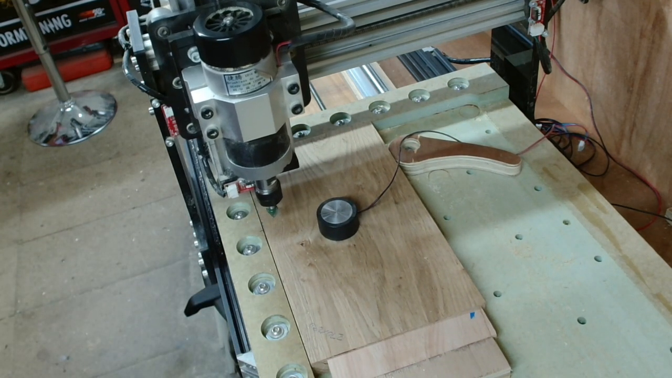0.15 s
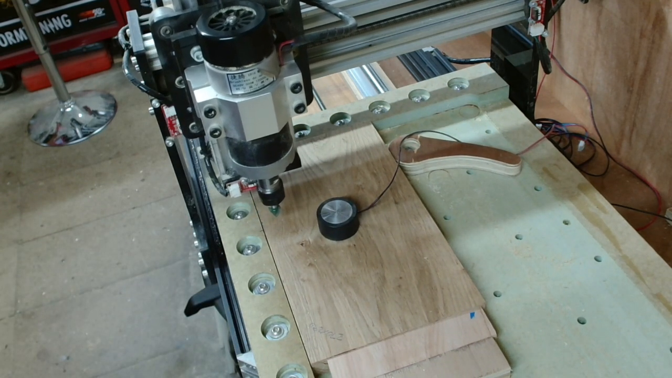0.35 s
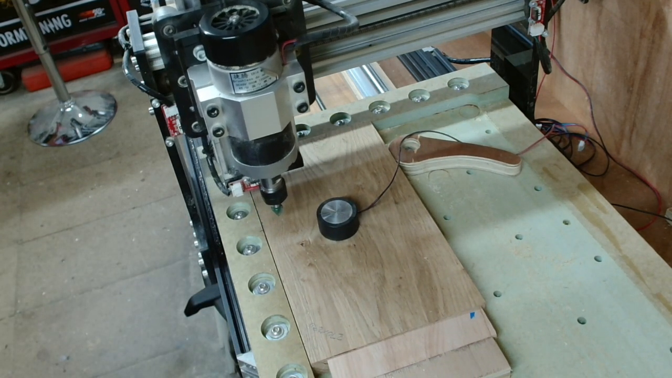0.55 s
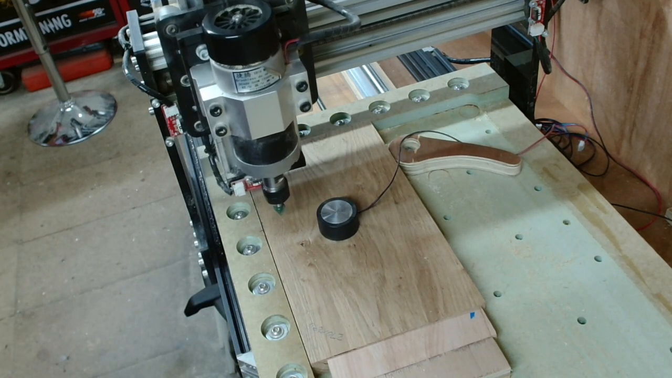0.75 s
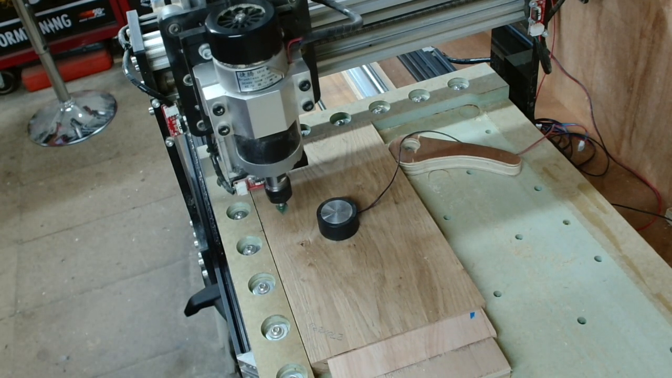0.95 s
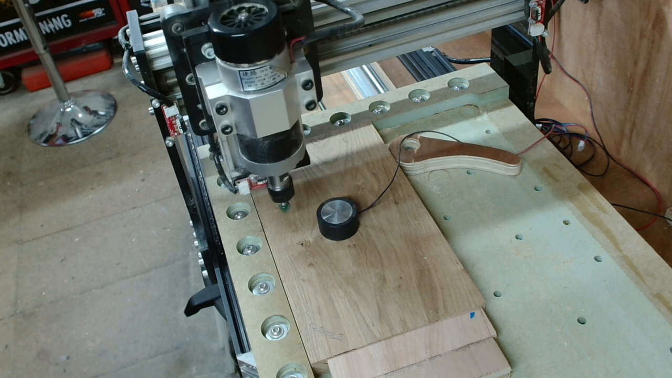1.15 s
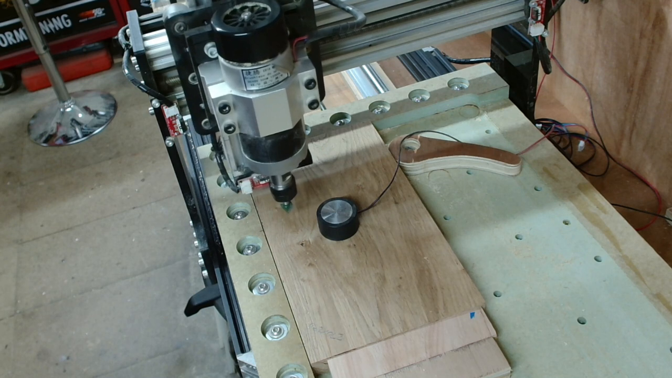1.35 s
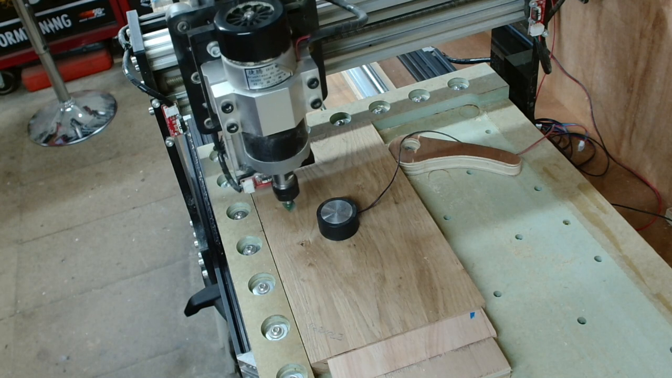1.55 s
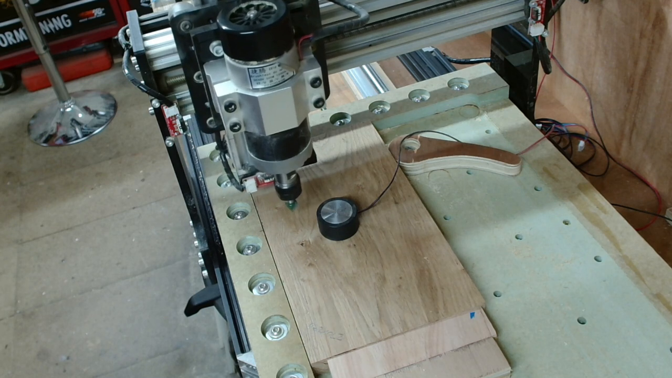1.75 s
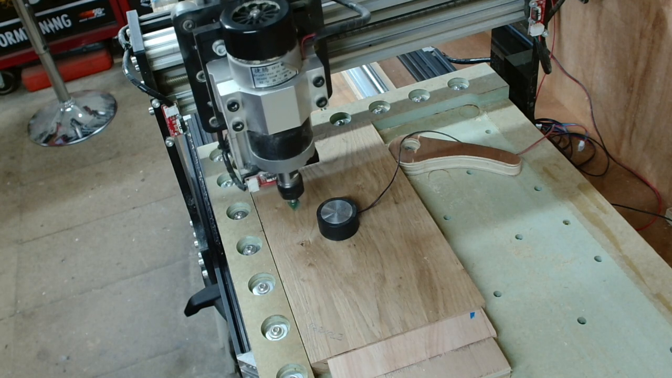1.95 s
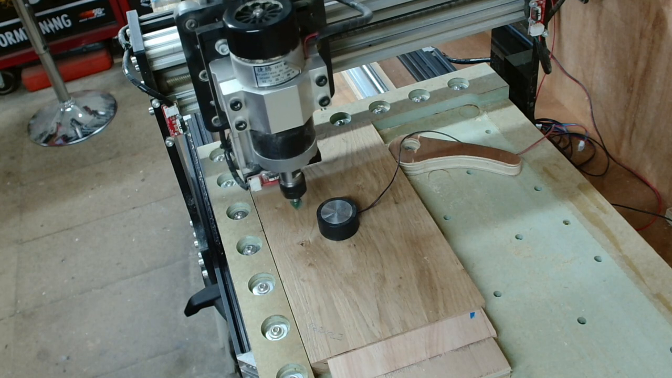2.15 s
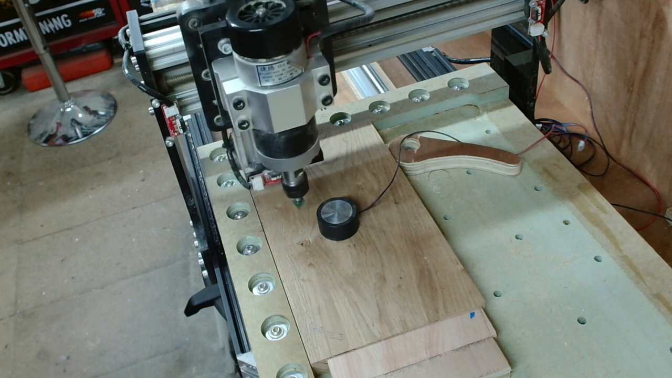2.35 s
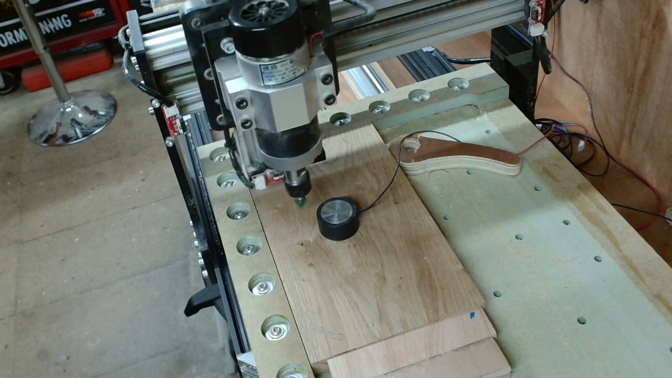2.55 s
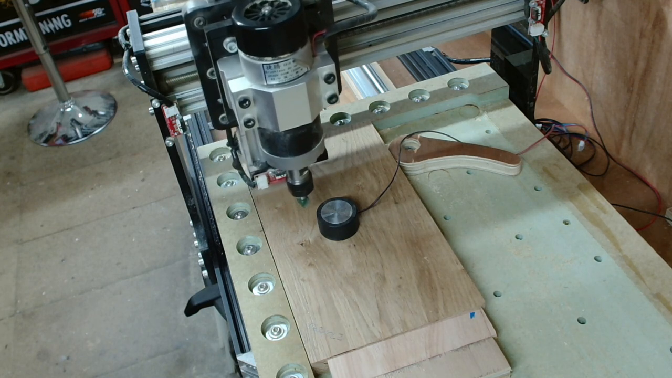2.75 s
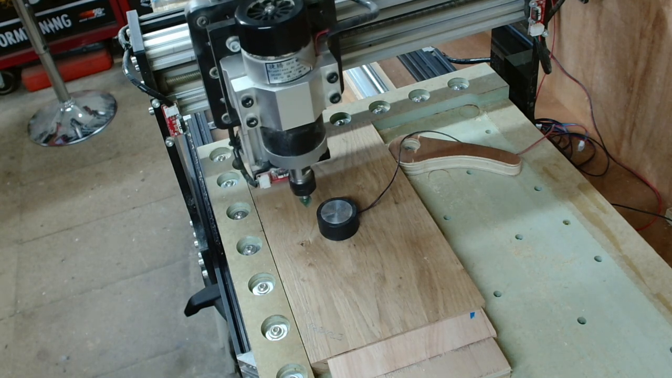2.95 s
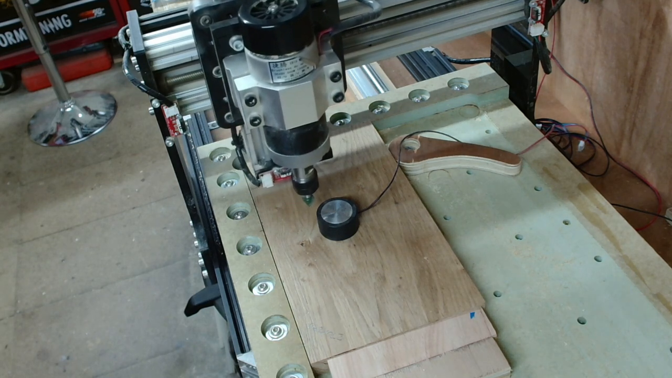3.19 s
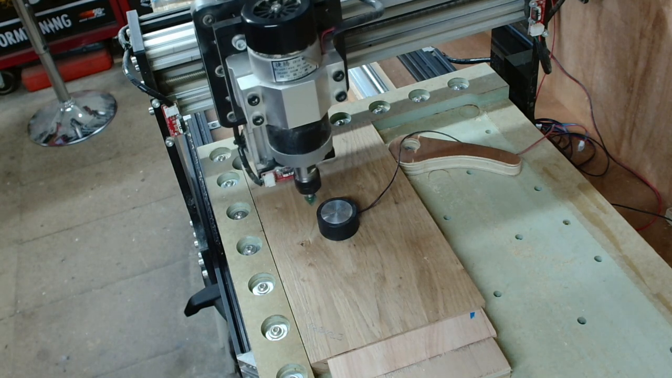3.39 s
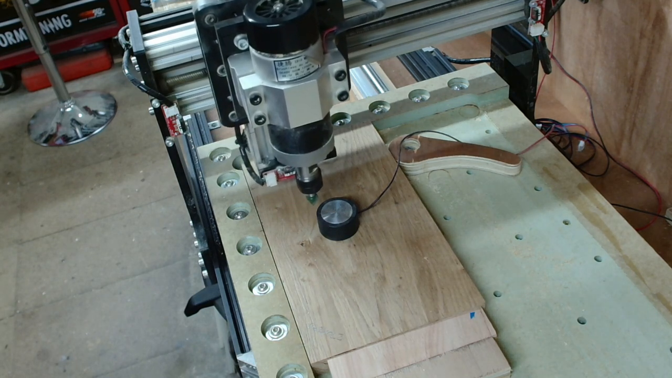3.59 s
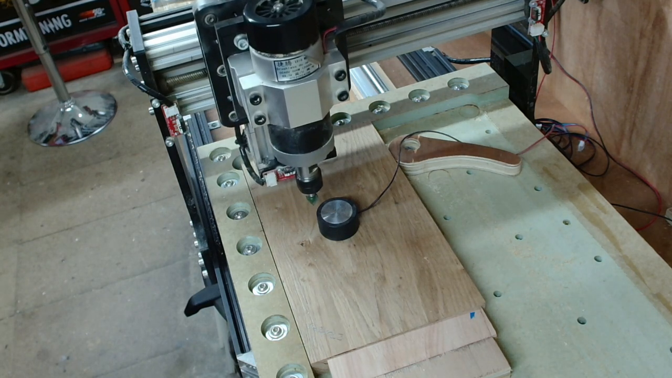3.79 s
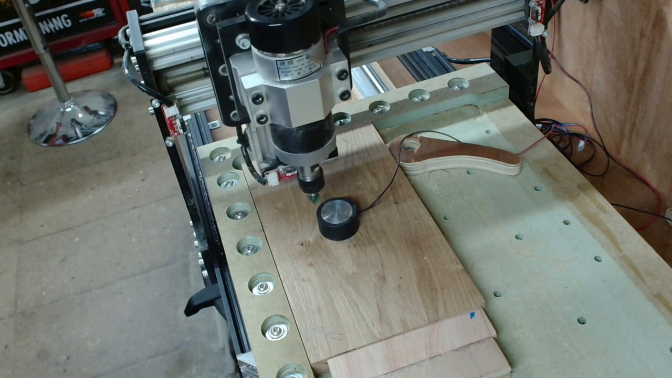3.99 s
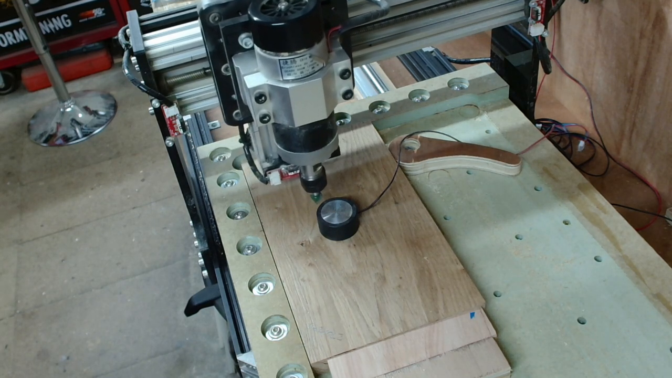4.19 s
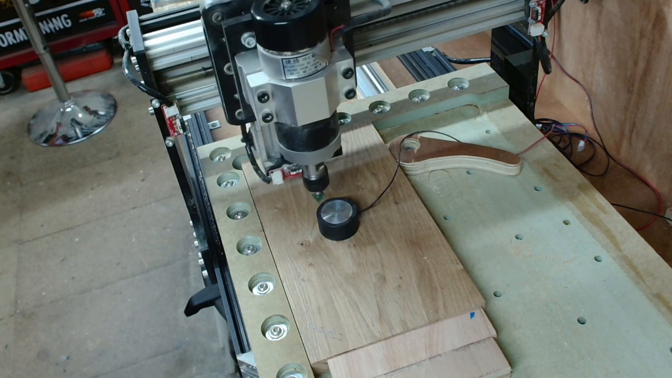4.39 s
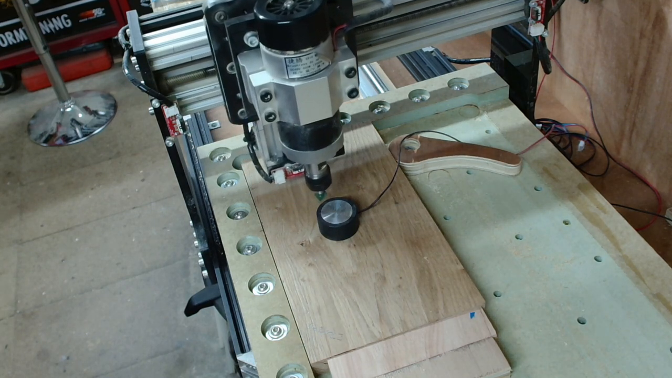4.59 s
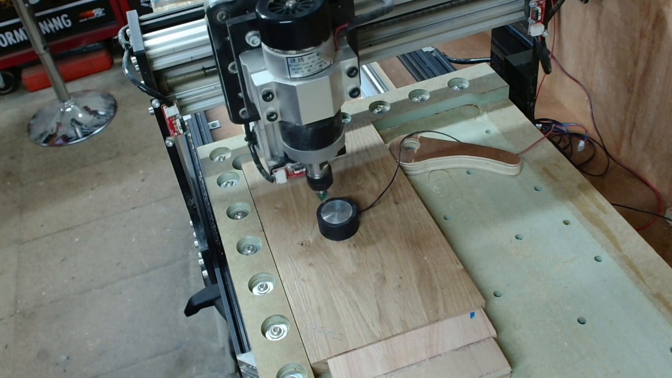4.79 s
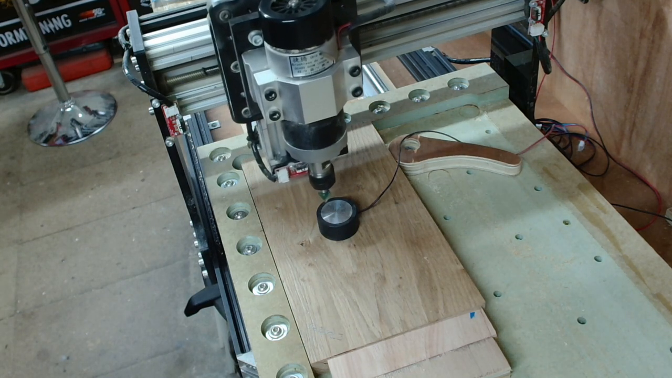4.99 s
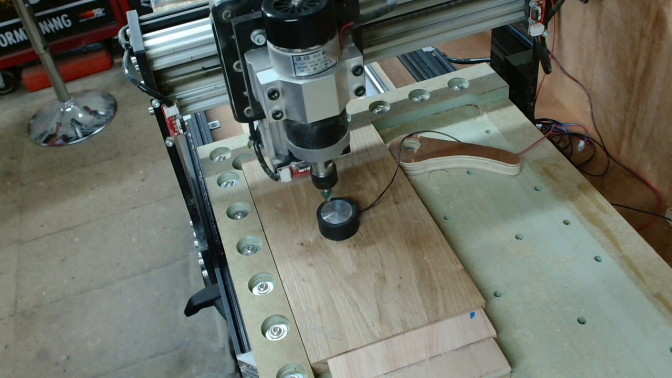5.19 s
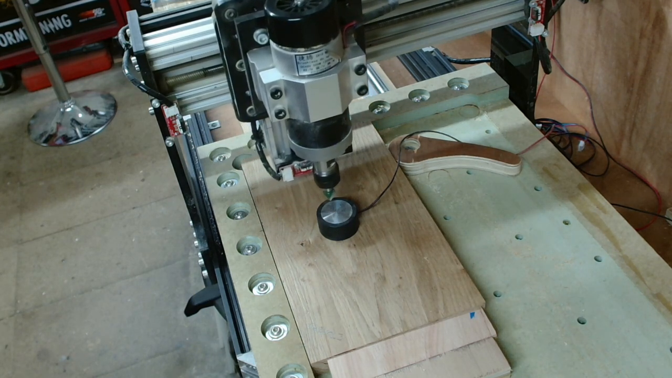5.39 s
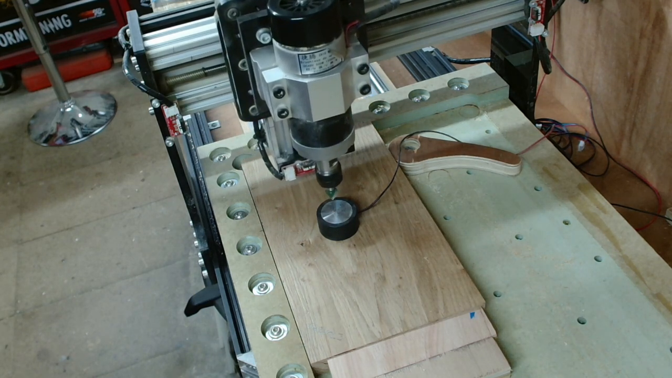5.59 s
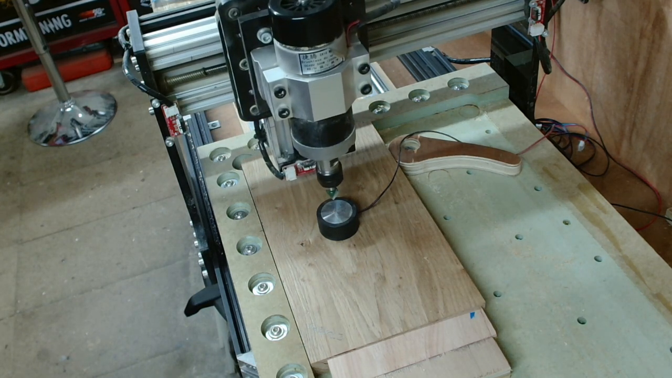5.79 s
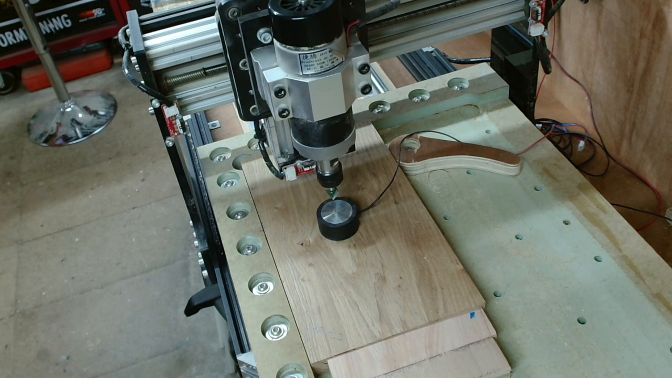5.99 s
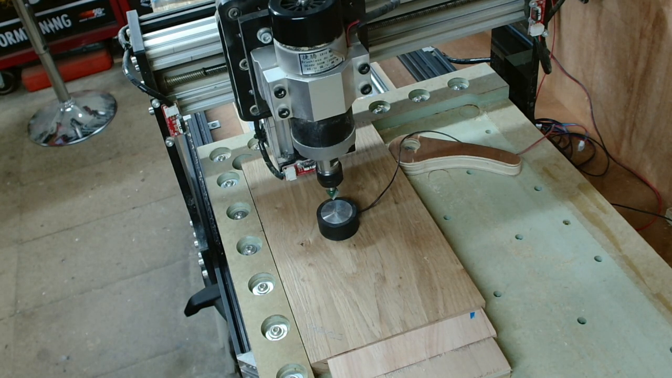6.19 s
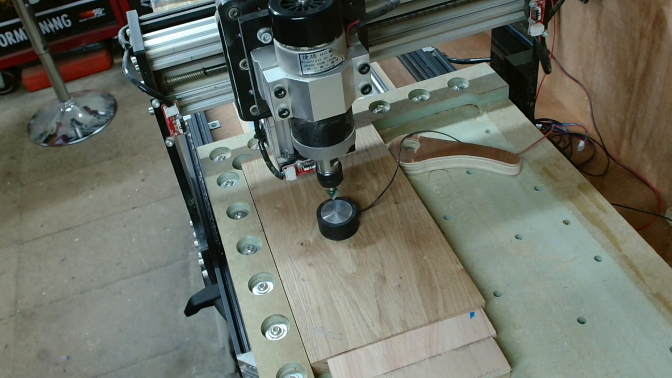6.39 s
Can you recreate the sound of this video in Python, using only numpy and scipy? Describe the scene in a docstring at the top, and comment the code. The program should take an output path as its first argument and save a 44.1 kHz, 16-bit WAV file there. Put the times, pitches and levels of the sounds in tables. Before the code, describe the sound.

Close-up buzzy motor drone around 290 hertz switches on and off as a machine carriage jogs, with soft clicks, dull knocks and quiet workshop hiss.

```python
"""A stepper motor jogs the carriage of a small router, close to a pair of microphone ports: each move ramps up,
holds a fixed step rate and ramps down, its overtones sweeping through the resonances of the frame.
The rolling carriage keeps loose parts ringing. A small cooling fan whines with blade-pass overtones amid steady
electrical hums, over shaped noise for workshop hiss and low rumble. Filtered noise puffs make small knocks
about the bench and the jog keys, which click before the later moves and during the long one."""
import sys
import numpy as np
from scipy import signal
from scipy.fft import rfft, irfft
from scipy.io import wavfile

SR = 44100
rng = np.random.default_rng(int(sys.argv[2]) if len(sys.argv) > 2 else 0)


def voltage_ratio(level):
    """Linear amplitude factor for a level in decibels (scalar or array-like)."""
    return 10 ** (np.asarray(level, float) / 20)


def store_wav(level_fs):
    """Save 16-bit WAV to argv[1]."""
    pcm = np.round(np.clip(np.atleast_2d(level_fs), -1, 1) * 32767)
    wavfile.write(sys.argv[1], SR, pcm.T.astype(np.int16))


N = 284004

# jog moves: start_s, standstill_s, flutter_hz (flutter of the carriage, wandering about this rate)
MOVES = [(-1.0, .03, 16.0), (.111, 3.631, 16.4), (3.879, 4.811, 17.2), (4.824, 5.762, 13.1),
         (6.406, 7.5, 16.0)]
# torque ripple heard at full speed: step_rate_multiple, level_db (rms), left_minus_right_db,
# left_lead_rad, extra_on_ramps_db
RIPPLE = [(.5, -37, -1.8, -.11, -6), (1, -14.9, -2.9, -.15, -5), (1.5, -53, -2, -.1, 6),
          (2, -32.6, 2.3, .45, 6), (3, -57, -2.9, -.14, 15), (4, -66, -2, -.2, 11), (5, -61, 1.3, -1.45, 0)]
# uneven drive wheel acting on the step tone: rate_hz (at full speed), level_swing_share, phase_swing_rad
WOBBLE = [(4.2, .04, .03), (8.2, .05, .05)]
# frame resonances under the motor: centre_hz, width_hz, gain_db
FRAME = [(80, 30, -24), (168, 19, -1.5), (296, 34, 0), (330, 30, -11), (385, 30, -15), (505, 24, 1),
         (720, 150, -26)]
# lightly damped parts shaken by the carriage: centre_hz, width_hz, level_db (rms while rolling, before panning)
RATTLE = [(146, 8, -47), (165, 20, -46), (186, 2.5, -40), (178, 20, -44.5), (215, 12, -47),
          (268, 18, -37.5), (290, 30, -45), (314, 10, -43), (337, 14, -46), (374, 18, -46), (393, 5, -52),
          (418, 20, -56), (493, 3, -41), (508, 4, -46), (490, 40, -47), (530, 20, -54)]
# fan tones: shaft_speed_multiple, level_db (rms a side), left_minus_right_db, left_lead_rad
FAN_TONES = [(1, -51, -2, -.1), (2, -52, -2, -.1), (7, -48.8, -3.8, -.15), (12, -60, -.8, -1.74),
             (13, -62, -.3, -1.7), (14, -48, -1.3, -2.57), (15, -66, -8, -2.2), (16, -69, -1.4, .8),
             (17, -66, .2, .35), (20, -71, 0, .5), (21, -61.5, 2.4, 1.2), (22, -71, 6, -.55),
             (27, -74, 0, -1.5), (28, -69.5, -5, -.35), (29, -76, 0, -1.5), (35, -64.5, 0, -.13),
             (42, -76, -2, -.03)]
# the passing head screens fan and hiss from the microphone: time_s, change_db
SCREEN = [(0, 0), (1.3, -.2), (3.0, -1.6), (5.6, -1.6), (6.44, -.3)]
# multiple of that change which the fan tones undergo: pitch_hz, factor
SCREENED = [(1100, 0), (2250, 3.0), (3400, 2.5), (4500, .6), (5600, .3)]
# steady electrical hums: pitch_hz, level_db (rms), left_minus_right_db, left_lead_rad
HUMS = [(59.5, -53, -1, -.05), (107, -49, -1.5, -.05), (120, -55, -1.5, -.05), (716, -61, .9, .14),
        (980, -59, 1.7, 1.28), (8000, -80, -1.8, -.01), (9550, -71, 0, -.01), (13500, -76, 0, -.01)]
# spectrum shape of workshop hiss and rumble: frequency_hz, relative_density_db (per Hz)
AIR = [(13, -23), (22, 1), (35, 2.5), (60, 1.5), (85, 0), (125, -8), (190, -7), (235, -15), (320, -10),
       (500, -12), (650, -18), (850, -18.5), (1050, -19.5), (1480, -26), (2100, -26), (3200, -30),
       (4200, -34.5), (5200, -41.5), (6400, -38), (7400, -45), (8300, -50), (9300, -42), (10500, -39),
       (12500, -51), (13600, -46), (16000, -62)]
# fan housing resonances lifting the hiss: centre_hz, width_hz, lift_db
HOUSING = [(1840, 250, 4), (2720, 120, 5), (3400, 200, 3), (4400, 250, 3), (5800, 500, 6), (6900, 500, 3)]
# hiss at the two microphone ports: frequency_hz, left_lead_rad
LEAD = [(0, 0), (950, 0.3), (1460, -1.0), (1810, -0.3), (2150, -3.0), (2670, -0.1), (3100, -1.5),
        (3360, 0.8), (3620, -1.1), (4220, -2.3), (4820, -1.6), (5170, -1.6), (5770, 0.1), (7670, -0.0)]
# likeness of the hiss at the two ports: frequency_hz, left_right_likeness (0 to 1)
ALIKE = [(30, .96), (500, .92), (1000, .45), (2000, .8), (4000, .68), (8000, .8), (12000, .95)]
# balance of the hiss: frequency_hz, left_minus_right_db
TILT = [(60, -1.0), (100, -1.0), (180, -1.5), (300, -1.5), (510, -1.5), (880, -1.0), (1500, 1.0),
        (2570, 0.0), (4400, 2.5), (7520, -0.5)]
# small knocks about the bench: start_s, level_db (peak before panning), pitch_hz
KNOCKS = [(.05, -36, 450), (.885, -37, 2150), (.895, -38, 1000), (2.33, -38, 1100), (3.65, -29, 80),
          (3.765, -35, 500), (3.79, -35, 70), (3.825, -37, 520), (3.86, -35, 480), (5.2, -40, 1300),
          (5.915, -31, 510), (5.975, -35, 490), (6.015, -34, 330), (6.12, -37, 320), (6.18, -38, 500),
          (6.385, -35, 480)]
# jog key presses: start_s, held_s, level_db, thud_db (both of the noise puff that drives cap and case)
KEYS = [(.0881, .1068, -48, -50), (.6967, .1158, -46, -43), (1.0888, .1088, -44, -38),
        (1.4071, .1048, -46, -46), (3.8555, .1272, -46, -44), (4.782, .1341, -47, -46),
        (6.3858, .12, -45, -40)]
# key cap resonances: centre_hz, width_hz, relative_gain_db
CLICK = [(4200, 2500, -7), (5900, 1200, -2), (7800, 900, -11), (11000, 700, -2), (14000, 3000, -16)]
# keyboard case resonances: centre_hz, width_hz, relative_gain_db
THUD = [(500, 150, 0), (800, 200, 0), (1450, 150, -3), (2200, 300, -6)]

RAMP_S = .066   # standstill to full speed
SIDE = np.array([[.5], [-.5]])   # left, right halves of a difference between the ports


def clock():
    """Time of every sample in seconds."""
    return np.arange(N) / SR


def rms_one(x):
    """Scale to an rms of 1."""
    return x / np.sqrt(np.mean(x ** 2) + 1e-20)


def at_hz(points, hz):
    """Straight lines on a log-frequency axis."""
    table = np.array(points)
    return np.interp(np.log(hz), np.log(np.maximum(table[:, 0], 1)), table[:, 1])


def drift(rate_hz):
    """Slow chance with spread 1: twice-smoothed noise, drawn at every 40th sample."""
    r = np.exp(-80 * np.pi * rate_hz / SR)
    rough = rng.standard_normal(N // 40 + 2002)
    slow = signal.lfilter([1], [1, -2 * r, r * r], rough)[2000:]   # drop the filter's settling
    return np.interp(np.arange(N) / 40, np.arange(len(slow)), rms_one(slow))


def any_phase():
    """A random starting phase in radians."""
    return 6 * rng.random()


def resonance(hz, width_hz):
    """Two-pole band-pass with gain 1 on top."""
    r = np.exp(-np.pi * width_hz / SR)
    return (1 - r * r) / 2 * np.array([1, 0, -1]), [1, -2 * r * np.cos(2 * np.pi * hz / SR), r * r]


def ring(x, hz, width_hz):
    """Sound passed through one resonance."""
    return signal.lfilter(*resonance(hz, width_hz), x)


def body(x, modes, flip=-1):
    """Resonances in parallel; equal signs leave a notch between neighbours, alternating signs do not."""
    return sum(flip ** k * voltage_ratio(db) * ring(x, hz, width_hz) for k, (hz, width_hz, db) in enumerate(modes))


def pan(left_minus_right_db):
    """Gains of the two sides for a level difference."""
    return voltage_ratio(left_minus_right_db * SIDE)


def tone(phase, db, pan_db, lead):
    """A sine as the two microphone ports hear it."""
    return np.sqrt(2) * voltage_ratio(db) * pan(pan_db) * np.sin(phase + lead * SIDE)


def screen_db():
    """Level change of fan and hiss as the head passes the microphone."""
    return np.interp(clock(), *np.transpose(SCREEN))


def speed():
    """Share of full speed: constant acceleration up, hold, constant braking."""
    t = clock()
    return sum(np.clip(np.minimum(t - start, stop - t) / RAMP_S, 0, 1) for start, stop, _ in MOVES)


def flutter():
    """Phase of the carriage's flutter, at a rate of its own in each move."""
    starts, _, rates = np.transpose(MOVES)
    hz = rates[np.searchsorted(starts, clock()) - 1] + .7 * drift(.8)
    return 2 * np.pi * np.cumsum(hz) / SR + any_phase()


def overshoot():
    """The rotor swings about its speed as each ramp up ends: a level swing, dying away."""
    swing_db, decay_s, swing_hz = 4.5, .035, 21
    total_db = 0
    for start, _, _ in MOVES:
        age = clock() - start - RAMP_S
        decay = (age > 0) * np.exp(-np.maximum(age, 0) / decay_s)
        total_db = total_db + swing_db * decay * np.cos(2 * np.pi * swing_hz * age)
    return voltage_ratio(total_db)


def shudder(ramping):
    """Low-passed noise that shakes the carriage on the ramps."""
    lowpass = signal.butter(4, 750, fs=SR, output="sos")
    rough = signal.sosfilt(lowpass, rng.standard_normal(N))
    return voltage_ratio(-15) * ramping * rough * pan(-2.6)


def frame_gain(hz):
    """What the frame lets through at one frequency."""
    return abs(sum(voltage_ratio(db) * signal.freqz(*resonance(centre, width_hz), [hz], fs=SR)[1][0]
                   for centre, width_hz, db in FRAME))


def stepper(share):
    """Torque ripple at multiples of the step rate shakes the frame; the steps are sharper on the ramps."""
    step_hz = 290.13   # at full speed
    flutter_level_share, flutter_rad = .11, .21
    turns = 2 * np.pi * np.cumsum(share) / SR   # phase of 1 Hz at full speed
    swell = 1 + sum(depth * (1 + .3 * drift(1.5)) * np.sin(hz * turns + any_phase()) for hz, depth, _ in WOBBLE)
    sway = sum(rad * np.sin(hz * turns + any_phase()) for hz, _, rad in WOBBLE)
    beat, depth = flutter(), voltage_ratio(1.5 * drift(1.2))
    # flutter swings level and phase a quarter turn apart
    swell = (swell + flutter_level_share * depth * np.cos(beat)) * overshoot()
    sway = sway + flutter_rad * depth * np.sin(beat)
    ramping = np.clip(2.4 * (1 - share), 0, 1)
    braking = np.gradient(share) < 0
    push = np.clip(5 * share, 0, 1) * voltage_ratio(5 * ramping * braking + .3 * drift(1.0))   # braking is louder
    force = shudder(ramping)
    for k, db, pan_db, lead, ramp_db in RIPPLE:
        level_db = db + ramp_db * ramping
        phase = k * step_hz * turns
        if k == 2:
            level_db = level_db - .9 * clock()   # fades steadily with time, .9 dB per second
        if k == 1:
            phase = phase + sway
        ripple = tone(phase, level_db, pan_db, lead)
        if k == 1:
            ripple = ripple * swell
        force = force + ripple / frame_gain(k * step_hz)   # so the table holds at full speed
    return body(force * push, FRAME, flip=1)


def rolling(share):
    """Wheel roughness keeps the loose parts ringing; they settle soon after the carriage stops."""
    settle_s = .03
    out = 0
    for hz, width_hz, db in RATTLE:
        rough = ring(rng.standard_normal(N), hz, 1.6 * width_hz)
        out = out + voltage_ratio(db) * rms_one(ring(rough, hz, width_hz))
    keep = np.exp(-1 / (settle_s * SR))
    out = out * signal.lfilter([1 - keep], [1, -keep], share)
    return pan(-2.6) * [out, np.roll(out, -3)]   # the right port hears it 3 samples early


def fan():
    """Blade-pass tone with overtones and weaker shaft orders, flickering in the turbulent inflow."""
    blades, blade_pass_hz, creep_hz_per_s2 = 7, 1122.8, .09
    hz = blade_pass_hz + creep_hz_per_s2 * clock() ** 2 + .15 * drift(2.5)   # creeps up ever faster
    shaft = 2 * np.pi * np.cumsum(hz) / SR / blades
    screen = screen_db()
    screen = screen - screen.mean()
    out = 0
    for k, db, pan_db, lead in FAN_TONES:
        change_db = 1.1 * drift(8.0) + at_hz(SCREENED, k * blade_pass_hz / blades) * screen
        out = out + tone(k * shaft + any_phase(), db, pan_db, lead) * voltage_ratio(change_db)
    return out


def hums():
    """Fixed-pitch hums of the power electronics, drifting in level."""
    return sum(tone(2 * np.pi * hz * clock() + any_phase(), db, pan_db, lead) * voltage_ratio(.8 * drift(2.0))
               for hz, db, pan_db, lead in HUMS)


def air():
    """Hiss and rumble: a part common to both ports, arriving with a phase lead, and a diffuse part."""
    level_db = -35.2   # rms over both ports, before screening and drift
    hz = np.maximum(np.fft.rfftfreq(N, 1 / SR), 5)
    housing_db = sum(lift / (1 + (2 * (hz - centre) / width_hz) ** 2) for centre, width_hz, lift in HOUSING)
    db = at_hz(AIR, hz) + housing_db
    alike = np.clip(at_hz(ALIKE, hz), 0, 1)
    lead = np.interp(hz, *np.transpose(LEAD))
    common, left, right = rfft(rng.standard_normal((3, N)))
    direct = np.sqrt(alike) * common * np.exp(1j * lead * SIDE)
    diffuse = np.sqrt(1 - alike) * np.array([left, right])
    sum_gain = np.sqrt((1 + alike * np.cos(lead)) / 2)   # the spectrum is that of left plus right
    noise = irfft((direct + diffuse) * voltage_ratio(db + at_hz(TILT, hz) * SIDE) / sum_gain, N)
    return voltage_ratio(level_db + screen_db() + .5 * drift(3.0)) * rms_one(noise)


def knocks():
    """Short dull puffs, each coloured by one broad resonance; fainter rustles come at random."""
    rustles_per_s, rustle_db, low_hz, high_hz = 3.0, -46, 900, 2800
    decay_s = .015
    when, size, pitch = rng.random((int(rustles_per_s * N / SR), 3)).T
    rustles = zip(when * N / SR, rustle_db + 6 * (size - .5), low_hz * (high_hz / low_hz) ** pitch)
    out = 0
    for start, db, hz in list(KNOCKS) + list(rustles):
        age = clock() - start
        puff = rng.standard_normal(N) * (age >= 0) * np.exp(-np.maximum(age, 0) / decay_s) + 1e-18
        knock = ring(ring(puff, hz, .6 * hz), hz, .14 * hz)
        out = out + voltage_ratio(db) * knock / np.abs(knock).max()
    return out * pan(-1.4)


def keys():
    """A key going down or up gives a short rattle of noise in cap and case, then a weaker copy off the bench."""
    attack_s, snap_s, thud_s, echo_s, echo_db = .004, .017, .015, .021, -13
    click, cap_ring, thud = np.zeros((3, 2, N))
    for down, held, db, thud_db in KEYS:
        press = (down, db, .35, thud_db)
        release = (down + held, db - .5, .55, -50)   # the release has a case level of its own
        for start, level_db, ring_share, case_db in [press, release]:
            age = np.maximum(clock() - start, 0)
            mid, side = rng.standard_normal((2, N))
            noise = mid + .3 * side * [[1], [-1]]
            puff = noise * np.minimum(age / attack_s, 1) * voltage_ratio(2.5 * drift(150.0))
            snap = puff * np.exp(-(age / snap_s) ** 3)
            click += voltage_ratio(level_db) * snap
            cap_ring += voltage_ratio(level_db + 1.5 * rng.normal()) * ring_share * snap
            thud += voltage_ratio(case_db) * puff * np.exp(-age / thud_s)
    hit = 2.2 * body(click + 1e-18, CLICK)
    hit = hit + 7 * ring(cap_ring + 1e-18, 7000, 350)
    hit = hit + 7 * body(thud + 1e-18, THUD)
    hit = hit + voltage_ratio(echo_db) * np.roll(hit, int(echo_s * SR), axis=1) * (clock() > echo_s)
    return hit * pan(-.8)


def scene():
    """Motor, carriage, fan, hums, workshop air, knocks and keys."""
    share = speed()
    return stepper(share) + rolling(share) + fan() + hums() + air() + knocks() + keys()


def low_pass(x):
    """Removes everything above the highest recorded frequency."""
    return signal.sosfilt(signal.butter(12, 15300, fs=SR, output="sos"), x)


def record(dry):
    """The microphone loses most of its treble above a steep edge; a weak part leaks through."""
    edge_hz, leak_db = 8300, -24
    lowpass = signal.cheby2(8, 50, 1.15 * edge_hz, fs=SR, output="sos")
    highpass = signal.butter(4, edge_hz, "high", fs=SR, output="sos")
    heard = signal.sosfilt(lowpass, dry) + voltage_ratio(leak_db) * signal.sosfilt(highpass, dry)
    return low_pass(heard)


dry = scene()
out = record(dry)
store_wav(out)
```